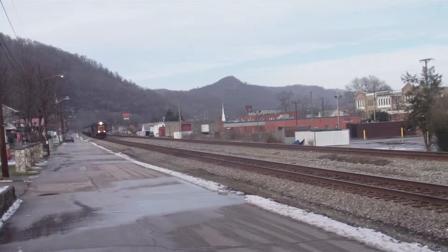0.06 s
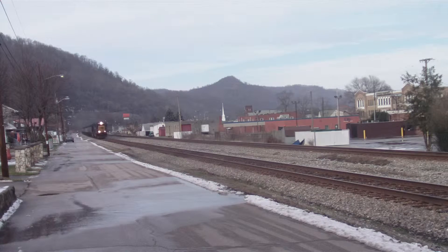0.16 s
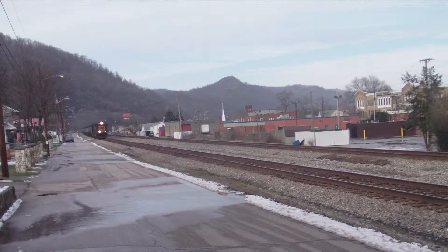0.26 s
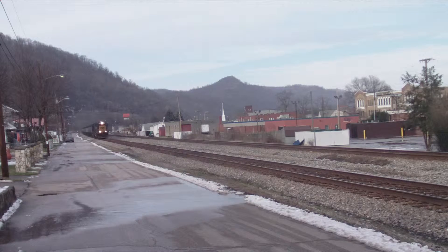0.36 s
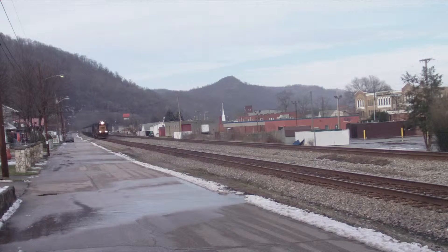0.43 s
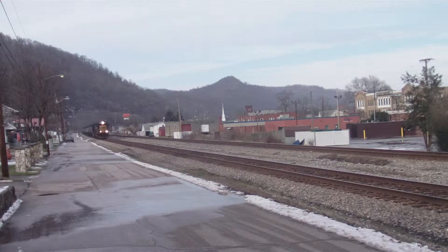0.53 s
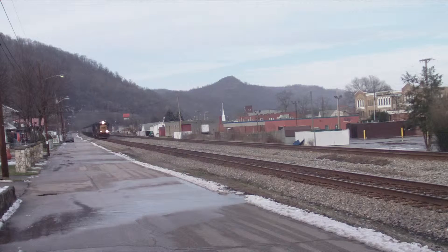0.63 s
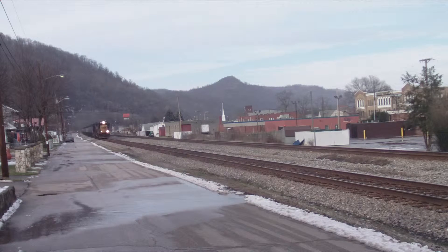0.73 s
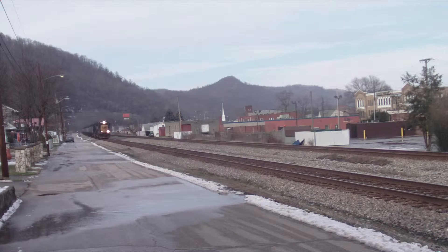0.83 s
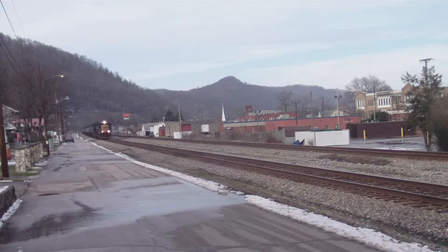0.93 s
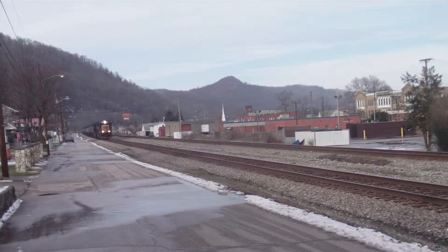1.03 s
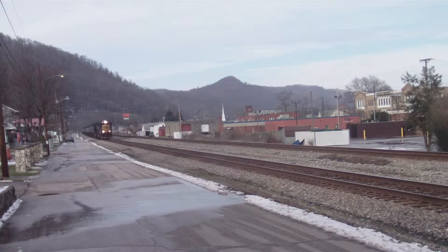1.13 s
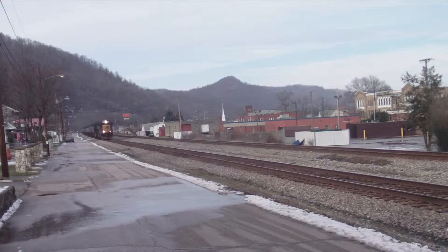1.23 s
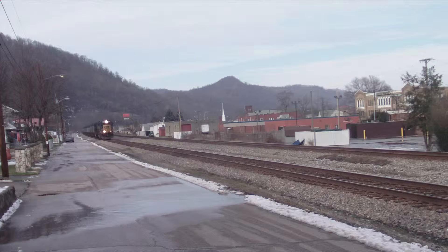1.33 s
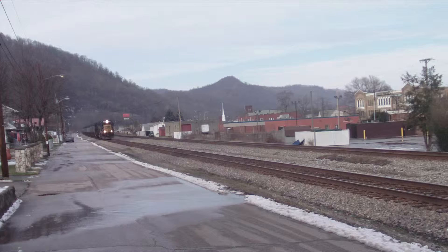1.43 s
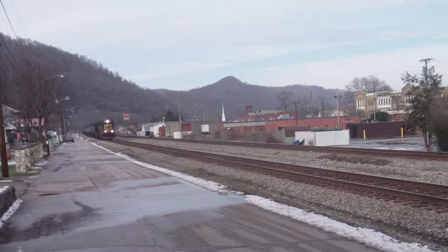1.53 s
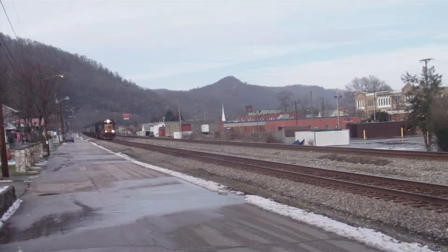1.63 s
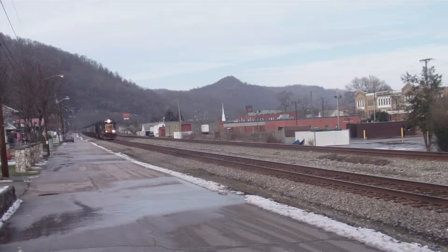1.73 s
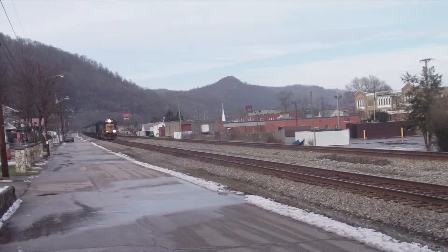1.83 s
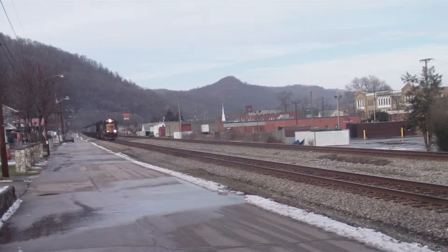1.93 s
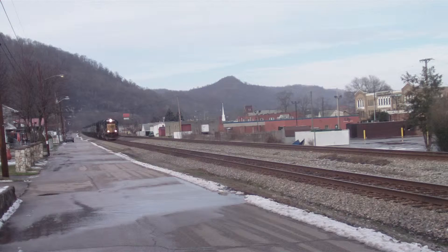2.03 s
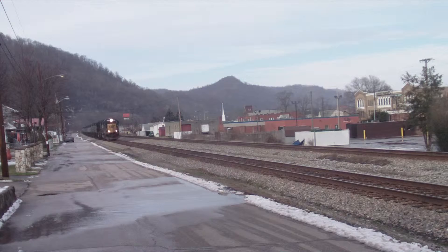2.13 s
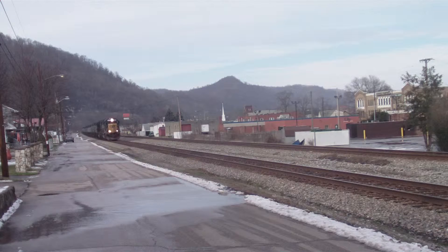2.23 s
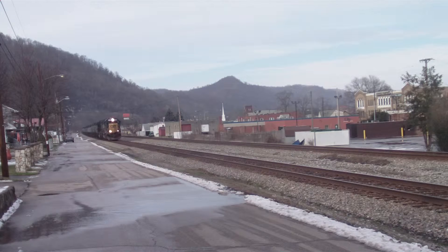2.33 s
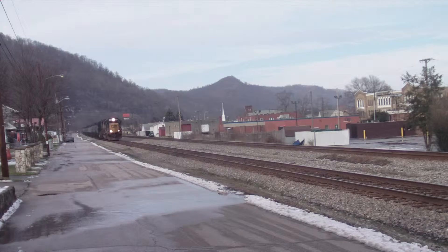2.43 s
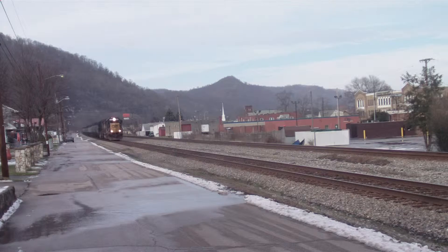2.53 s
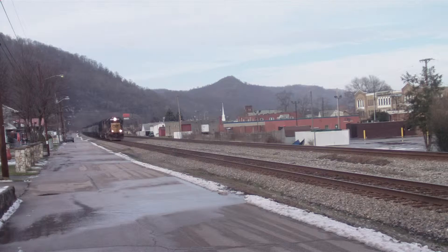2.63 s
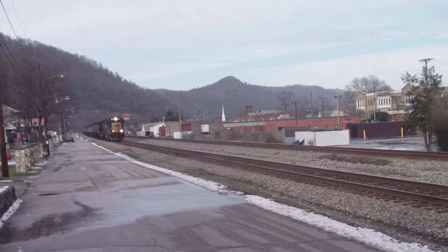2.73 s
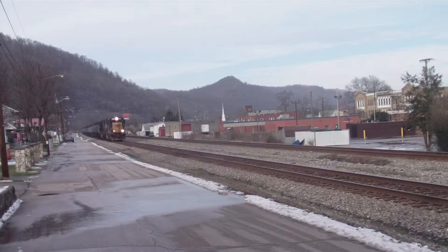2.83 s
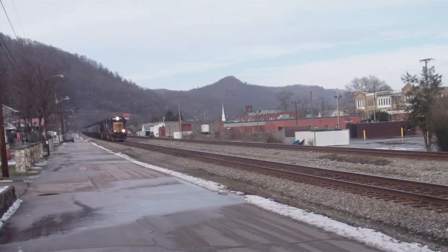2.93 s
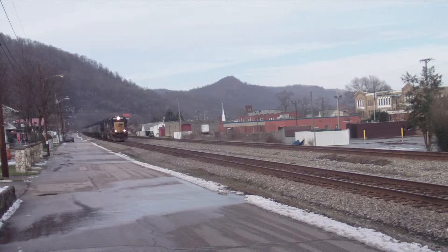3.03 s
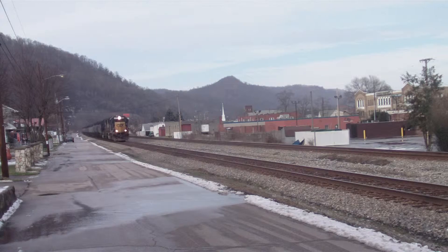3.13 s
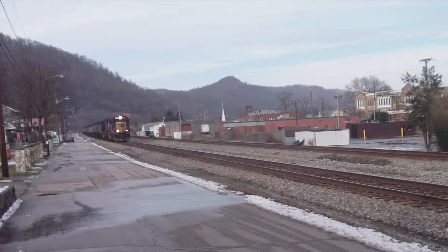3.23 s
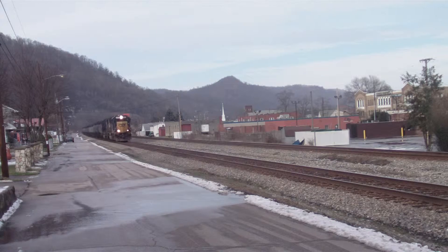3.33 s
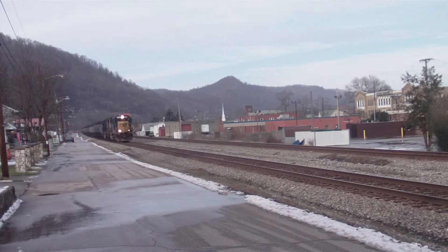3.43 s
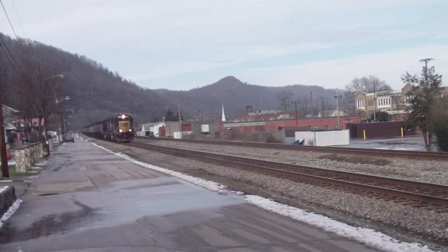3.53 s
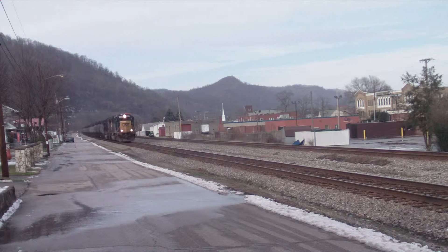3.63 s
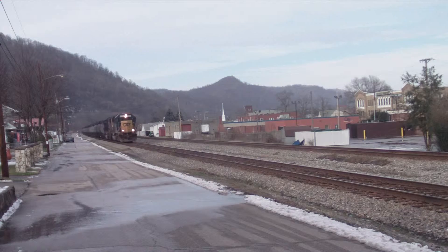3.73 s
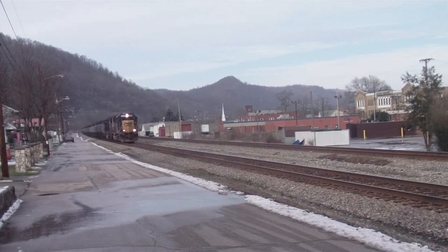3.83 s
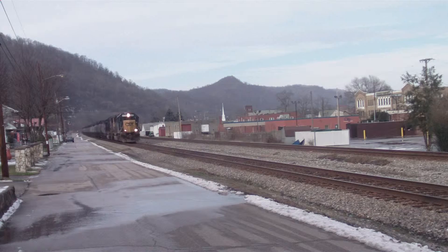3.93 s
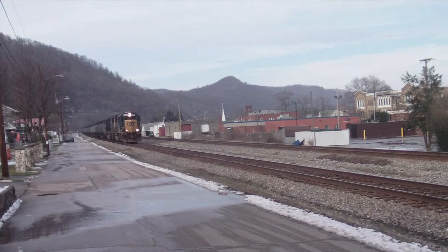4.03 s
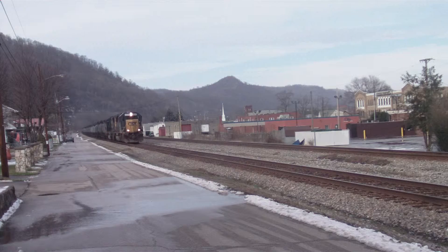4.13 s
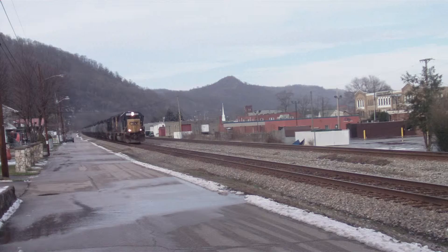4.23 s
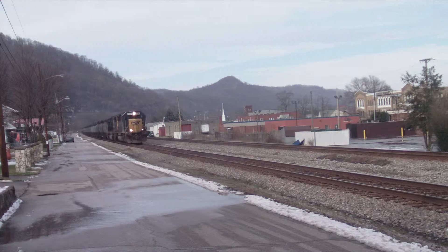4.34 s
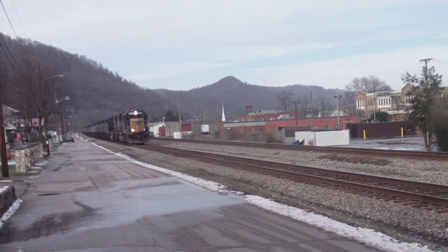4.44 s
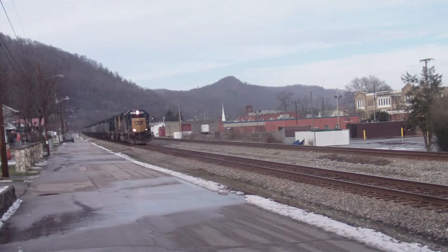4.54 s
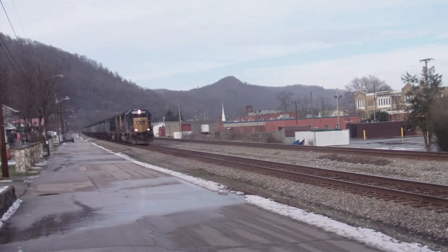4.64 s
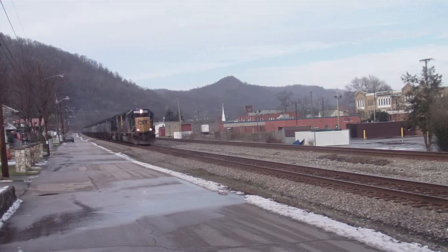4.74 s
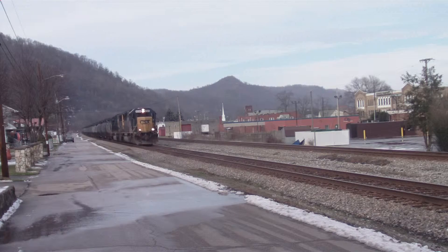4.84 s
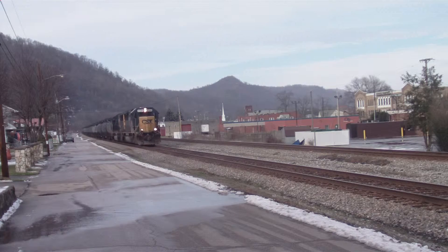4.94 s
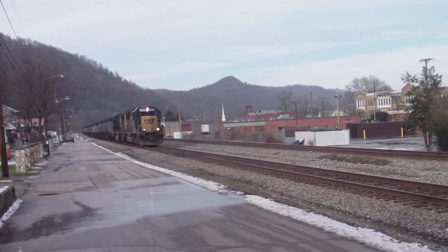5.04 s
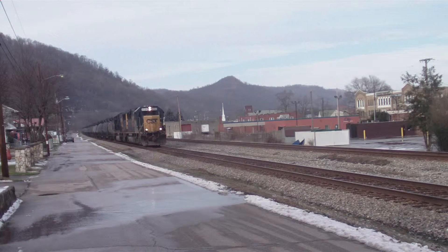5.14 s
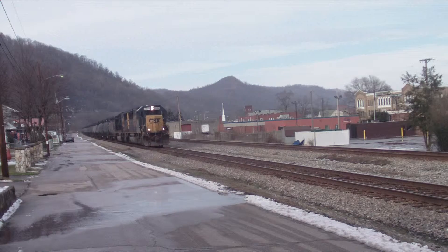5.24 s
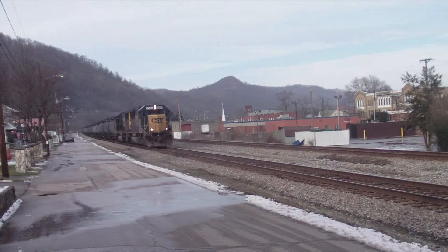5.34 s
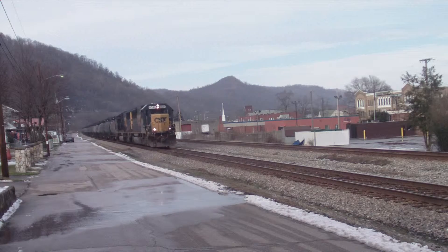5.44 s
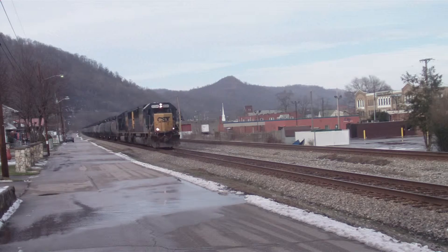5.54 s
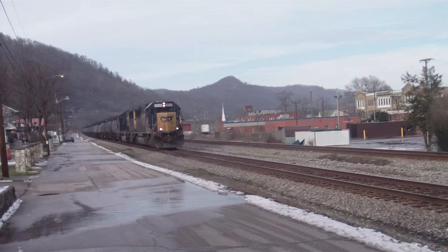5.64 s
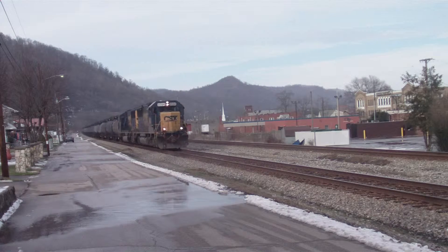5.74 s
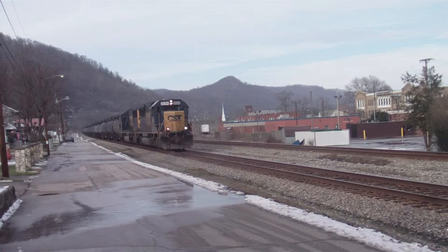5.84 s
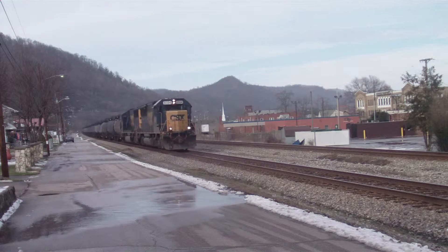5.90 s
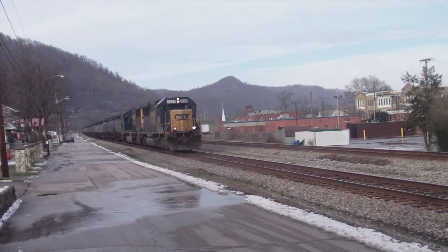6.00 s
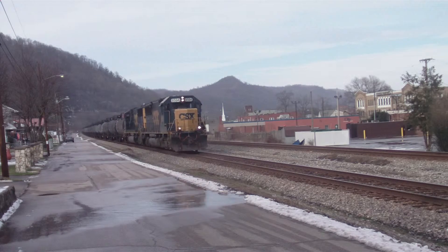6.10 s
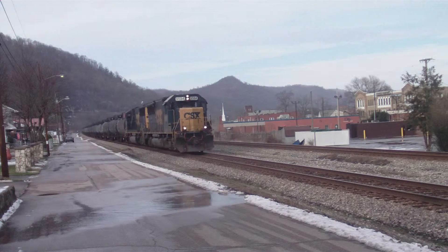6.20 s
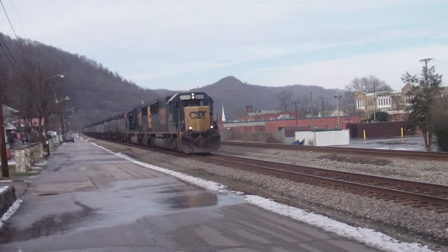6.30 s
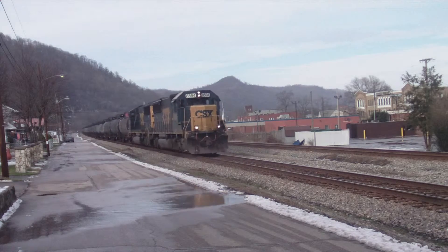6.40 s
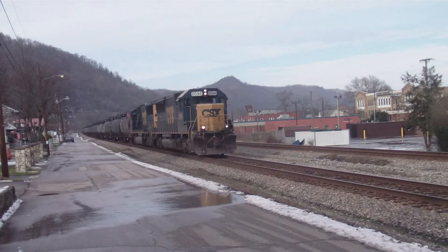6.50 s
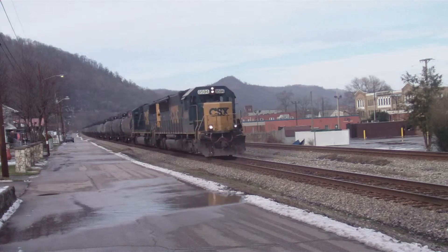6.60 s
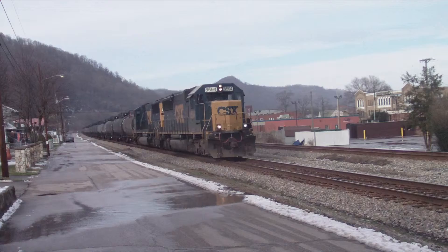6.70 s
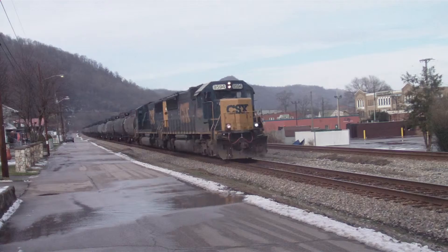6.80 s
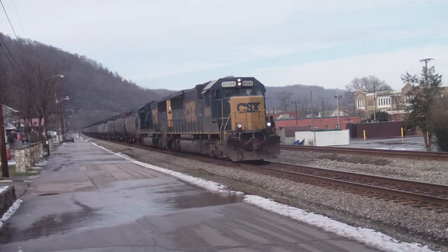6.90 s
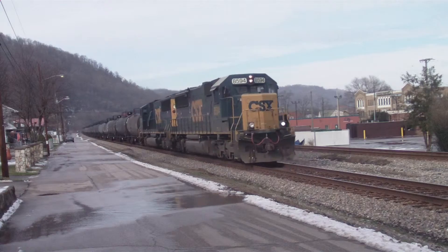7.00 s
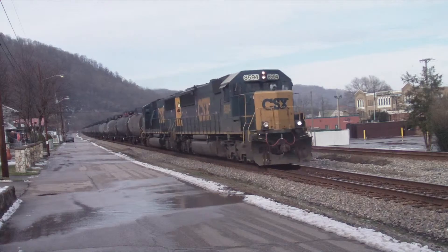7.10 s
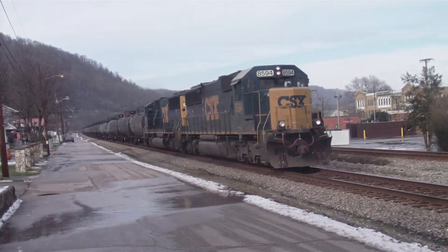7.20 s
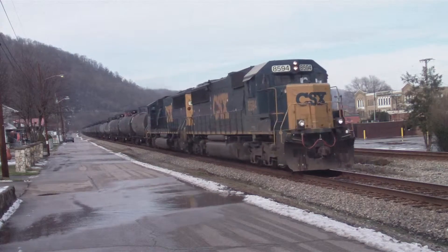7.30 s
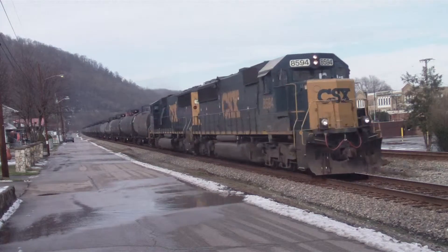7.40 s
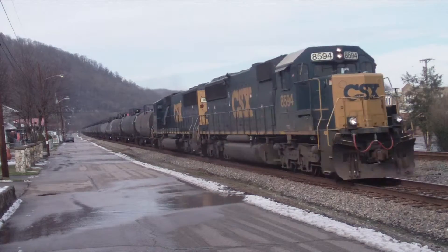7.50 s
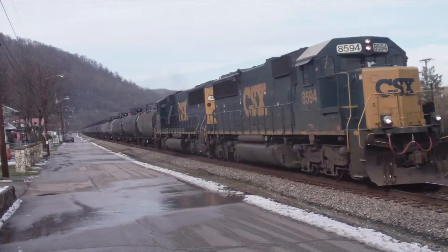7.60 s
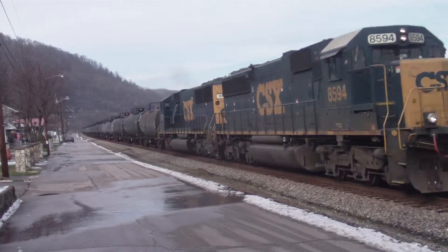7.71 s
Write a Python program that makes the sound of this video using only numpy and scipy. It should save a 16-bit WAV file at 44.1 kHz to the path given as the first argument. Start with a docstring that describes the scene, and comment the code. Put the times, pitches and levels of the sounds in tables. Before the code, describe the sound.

Low beating diesel throb grows from a distant hum to an overwhelming roar, with singing rails, fan whine and wheel hiss as the locomotives arrive.

```python
"""Two diesel locomotives haul a freight train towards a listener beside the track.
Their two-stroke engines, sums of sines on multiples of the crank rate, throb and beat against each other.
Filtered noise gives the swelling exhaust roar, wheel noise and wagons; narrow resonances give the
singing, fizzing rails and the whining fans and gears. A blower hums and whistles as it nears.
Faint birds, scuffs, a tick and a thin buzz sound between, over a distant town and a steady faint hiss."""
import sys
import numpy as np
from scipy import signal
from scipy.fft import rfft, irfft
from scipy.io import wavfile
from scipy.ndimage import uniform_filter1d

SR = 44100
rng = np.random.default_rng(int(sys.argv[2]) if len(sys.argv) > 2 else 0)


def int16_out(signal):
    """Quantize to a 16-bit WAV file."""
    q = np.round(np.clip(np.atleast_2d(signal).T, -1, 1) * 32767)
    wavfile.write(sys.argv[1], SR, q.astype(np.int16))


N = 342216
T = np.arange(N) / SR  # time in seconds


def undb(db):
    """Logarithmic level: decibels become an amplitude gain."""
    return 10 ** (np.asarray(db) / 20)


def unit(x):
    """Normalisation: scale to an rms of 1."""
    return x / np.sqrt(np.mean(x ** 2))


def curves(table):
    """Linear interpolation: each column after the seconds becomes a value per sample."""
    s, *columns = np.transpose(table)
    return [np.interp(T, s, column) for column in columns]


def noise():
    """White noise: equal power at every frequency."""
    return rng.standard_normal(N)


def colour(x, points):
    """Spectral shaping: follow (Hz, dB) points, falling 20 dB per octave past their ends."""
    hz, db = np.transpose(points)
    octave = np.log2(np.maximum(np.fft.rfftfreq(N, 1 / SR), 1))
    outside = np.abs(octave - np.clip(octave, np.log2(hz[0]), np.log2(hz[-1])))
    gain = undb(np.interp(octave, np.log2(hz), db) - 20 * outside)
    return unit(irfft(rfft(x) * gain, N))


def ringing(modes):
    """Noise-driven resonance: random force keeps steep modes of (Hz, width in Hz, dB) ringing."""
    f = np.fft.rfftfreq(N, 1 / SR)
    power = 0
    for hz, width, db in modes:
        detuning = (f - hz) / width * np.sqrt(2)
        power = power + undb(db) ** 2 / width / (1 + detuning ** 2) ** 2
    return unit(irfft(rfft(noise()) * np.sqrt(power), N))


def walk(rate):
    """Slow random modulation: a new level every 1 / rate seconds, joined by lines, rms 1."""
    levels = rng.standard_normal(size=1000)
    return unit(np.interp(T * rate + rng.random(), np.arange(len(levels)), levels))


def tone(cycles, waver_db, drift):
    """Atmospheric scintillation: the air on the way bends a sine's level (dB) and phase (radians)."""
    angle = 2 * np.pi * cycles + drift * walk(5)
    return unit(np.sin(angle) * undb(waver_db * walk(6)))


def burst(s, db, decay):
    """Impact envelope: a sudden contact dies away exponentially."""
    return undb(db) * (T >= s) * np.exp(-np.minimum(np.abs(T - s) / decay, 20))


def bumps(table):
    """Gaussian swells: sum of bell-shaped pulses from rows of (s, height, length in s)."""
    return sum(height * np.exp(-.5 * ((T - s) / length) ** 2) for s, height, length in table)


# The train's path: its speed, when its front draws level, how far to the side the track lies
SPEED_M_S, PASSES_S, TRACK_M = 17.38, 7.815, 7.9
REFERENCE_M = 50


def carried(db, doubling_db, metre_db):
    """Spreading and absorption: level rises as the train's distance shrinks."""
    distance = np.hypot(SPEED_M_S * (T - PASSES_S), TRACK_M)
    spreading = doubling_db * np.log2(distance / REFERENCE_M)
    absorption = metre_db * (distance - REFERENCE_M)  # lost to ground and air
    return db - spreading - absorption


# Far off, the train is partly screened: by how much, the midpoint of coming clear, its time scale
SCREEN_DB, CLEAR_S, CLEARING_S = -3.5, 1.09, .15


def screening():
    """Shielding: the screen's loss in dB fades smoothly to nothing."""
    return SCREEN_DB * (1 - np.tanh((T - CLEAR_S) / CLEARING_S)) / 2


# Surges as the front comes close. Each row: centre in seconds, relative rise in dB, length in seconds.
FRONT_SURGES = [(7.541, 4, .022), (7.682, 5, .025)]


def surging():
    """Level modulation: brief rises, in dB, as the front comes close."""
    return bumps(FRONT_SURGES)


# Hiss of microphone and wheels. Each row: frequency in Hz, relative density in dB per Hz.
HISS_SPECTRUM = [(2000, -2), (3500, 3), (5000, 1.5), (6000, 0.5), (7200, 2), (8000, -0.5), (9000, -9),
                 (12000, -17)]
HISS_DB = -75.5


def steady_hiss():
    """Stationary noise: steady faint microphone hiss."""
    return colour(noise(), HISS_SPECTRUM) * undb(HISS_DB)


# Spectrum of the town's hum. Each row: frequency in Hz, relative density in dB per Hz.
TOWN_SPECTRUM = [(150, -2), (400, -8), (650, 4), (1100, 1.5), (1480, 1.5), (1750, -3.5), (2050, -3),
                 (2500, -30), (5000, -42)]
TOWN_DB = -49


def town():
    """Diffuse background: shaped noise forms the distant hum, its level wavering slowly."""
    return colour(noise(), TOWN_SPECTRUM) * undb(TOWN_DB + 0.41 * walk(2.1))


# Faint chirps, as of birds. Each row: centre in seconds, start in Hz, end in Hz,
# length in seconds, peak level in dB.
BIRD_CHIRPS = [(0.593, 1620, 1415, 0.096, -49), (.65, 6700, 7000, .04, -70),
               (0.909, 1595, 1590, 0.12, -46.5), (1.185, 1560, 1510, 0.085, -47),
               (1.686, 1470, 1608, 0.078, -46), (1.931, 1460, 1600, 0.05, -43),
               (2.228, 8800, 7400, 0.014, -61), (2.869, 1910, 2010, 0.089, -47),
               (3.123, 2230, 2200, .08, -52), (3.165, 11400, 9900, .016, -61),
               (4.529, 7700, 6300, .05, -55), (4.645, 5800, 5100, 0.038, -56)]


def birds(roughness=0.41):
    """Frequency glide: short whistles swell and fade with an unsteady phase."""
    out, flutter = np.zeros(N), roughness * walk(120)
    for s, start_hz, end_hz, length, db in BIRD_CHIRPS:
        during = np.abs(T - s) < length / 2
        progress = (T[during] - s) / length + .5
        cycles = np.cumsum(start_hz + (end_hz - start_hz) * progress) / SR
        whistle = np.sin(2 * np.pi * cycles + 2 * flutter[during])
        out[during] += undb(db) * np.sin(np.pi * progress) * whistle
    return out


# Small scuffs close by. Each row: start in seconds, level in dB, decay in seconds.
SCUFF_EVENTS = [(1.37, -56, .014), (1.603, -49, 0.014), (2.125, -52, 0.014), (2.794, -52, 0.016),
                (4.529, -58, 0.021), (7.408, -35, .008)]
# Spectrum of the scuffs. Each row: frequency in Hz, relative density in dB per Hz.
SCUFF_SPECTRUM = [(2000, -1), (3500, 6), (7000, -2), (9500, -17), (13000, -23)]


def scuffs():
    """Friction noise: shaped noise under sudden, decaying envelopes."""
    return sum(burst(*row) for row in SCUFF_EVENTS) * colour(noise(), SCUFF_SPECTRUM)


# What the tick rings with. Each row: frequency in Hz, level in dB against TICK_DB, decay in seconds.
TICK_RESONANCES = [(3980, -0.5, 0.0024), (4400, -5, .0015), (5250, -2, 0.00091), (7070, 6.5, 0.00077),
                   (8600, -3, 0.00058), (10400, 0, .0005)]
TICK_S, TICK_DB = 5.752, -27


def tick():
    """Modal impact: one sharp contact close by sets decaying sines ringing together."""
    out = 0
    for hz, db, decay in TICK_RESONANCES:
        out = out + burst(TICK_S, TICK_DB + db, decay) * np.sin(2 * np.pi * hz * (T - TICK_S))
    return out


# Tones of a brief thin buzz, as of a small motor. Each row: frequency in Hz, level in dB.
BUZZ_TONES = [(6272, -55), (7840, -46.5), (9408, -63), (10976, -59), (12544, -59)]
BUZZ_S, BUZZ_LENGTH_S = 4.119, .019  # centre and length


def buzz():
    """Additive synthesis: steady sines sound together for a moment."""
    running = 1. * (np.abs(T - BUZZ_S) < BUZZ_LENGTH_S / 2)
    tones = sum(undb(db) * np.sin(2 * np.pi * hz * T) for hz, db in BUZZ_TONES)
    return uniform_filter1d(running, size=60) * tones  # smoothed switching


# Spectrum of wheels on steel. Each row: frequency in Hz, relative density in dB per Hz.
WHEEL_SPECTRUM = [(500, -3), (900, -1), (1200, -1), (1450, -1.5), (1750, -2.5), (2020, -4), (2400, -7.5),
                  (3300, -11.5), (4500, -19), (6500, -28.5), (10000, -37.5), (15000, -51)]
WAGONS_DB = -50.5


def wagons(screen_db):
    """Extended line source: the long row of wagons rushes at a nearly even level once clear."""
    return colour(noise(), WHEEL_SPECTRUM) * undb(WAGONS_DB + screen_db + 0.57 * walk(6))


# Rail resonances between sleepers. Each row: frequency in Hz, width in Hz, relative level in dB.
SLEEPER_MODES = [(860, 97, -7.5), (956, 61, -2.5), (1040.5, 54, -4)]
# How the song carries: dB at REFERENCE_M before trim, dB lost per doubling, dB lost per metre.
SONG_LOSS = (-44.5, 4.4, 0)
# Waves far ahead along the rail head. Each row: frequency in Hz, width in Hz, relative level in dB.
RAIL_HEAD_MODES = [(9980, 1200, 0.5), (11600, 400, -6.5), (13360, 1400, 0)]
# The fizz arrives ahead of the train. Each row: time in seconds, level in dB.
FIZZ_LEVEL = [(0, -76), (2, -76.5), (3.5, -74), (4.4, -67), (6, -55.5), (7.76, -56)]
# Grit under the wheels. Each row: centre in seconds, peak level in dB, length in seconds.
GRIT_ZINGS = [(.87, -71, .04), (4.068, -69, .04), (4.6, -62, .03), (5.36, -55, .035), (6.19, -61, .02),
              (7.24, -46, .015)]


def rails():
    """Structure-borne sound: rails sing near 1 kHz, fizz far above and carry zings of crushed grit."""
    song_db = carried(*SONG_LOSS) + 1.8 * walk(9)
    song = ringing(SLEEPER_MODES) * undb(song_db + 0.5)
    fizz = ringing(RAIL_HEAD_MODES) * undb(curves(FIZZ_LEVEL)[0])
    swell = bumps([(s, undb(db), length) for s, db, length in GRIT_ZINGS])
    zings = swell * ringing([(14200, 1300, 0)])
    return song + fizz + zings


# Highest treble of the wheels. Each row: frequency in Hz, relative density in dB per Hz.
SIZZLE_SPECTRUM = [(7500, -12), (8800, -4.5), (9850, 0.5), (10600, -9.5), (12000, -14), (15000, -32)]
# How the hiss carries: dB at REFERENCE_M before trim, dB lost per doubling, dB lost per metre.
HISS_LOSS = (-63, 5.58, 0.22)


def wheel_treble():
    """Air absorption: hiss gets through only from near, and the highest treble catches up last."""
    hiss_db = carried(*HISS_LOSS)
    hiss = colour(noise(), HISS_SPECTRUM) * undb(hiss_db + 7.0 + 0.92 * walk(19))
    sizzle_db = hiss_db + np.interp(T, [5.2, 7.2], [-7, 3])
    return hiss + colour(noise(), SIZZLE_SPECTRUM) * undb(sizzle_db)


# Spectrum of the bogies. Each row: frequency in Hz, relative density in dB per Hz.
BOGIE_SPECTRUM = [(220, -18), (340, -6.5), (420, -1), (510, 1), (600, -5), (680, -9), (780, -9.5),
                  (1000, -8.5), (1600, -35)]
# Fans and gears. Each row: frequency in Hz, width in Hz, relative level in dB.
FAN_GEAR_MODES = [(299.6, 7.2, -10), (372.8, 7, -14.5), (418.3, 13, -23.5), (875, 5.2, -9.5),
                  (1575, 50, -12.5)]
# How gear and wheels carry: dB at REFERENCE_M before trim, dB lost per doubling, dB lost per metre.
GEAR_LOSS = (-40.5, 6.23, 0.0055)
WHEEL_LOSS = (-45.5, 4.66, 0.06)


def rolling(surge_db, shudder_db=1.78):
    """Roughness excitation: bogies roar, fans and gears whine, wheels rush on the steel."""
    gear_db = carried(*GEAR_LOSS) + surge_db
    wheel_db = carried(*WHEEL_LOSS) + surge_db
    # uneven treads shake bogie and wheel together; distance smears this out
    shudder = shudder_db * walk(28) * np.interp(T, [4, 7.5], [.5, 1.3])
    gear = colour(noise(), BOGIE_SPECTRUM) * undb(gear_db - 1.5 + shudder)
    whine = ringing(FAN_GEAR_MODES) * undb(gear_db - 8.5)
    wheels = colour(noise(), WHEEL_SPECTRUM) * undb(wheel_db + 1.34 + 0.41 * shudder)
    return gear + whine + wheels


# The leading engine's blower and turbine. Each row: time in seconds, hum in dB before trim,
# whistle in dB before trim.
BLOWER_LEVELS = [(0, -64, -47.5), (4.6, -58, -52.5), (5.35, -45.5, -51), (6.1, -42.5, -36.5),
                 (6.5, -41, -35.5), (7.3, -52, -35.5), (7.52, -27, -36), (7.76, -21, -29)]
BLOWER_HZ, TURBINE_HZ = 531.5, 1022


def blower():
    """Rotor tones: a hum and a breathy whistle stand clear of the roar as the locomotive nears."""
    hum_db, whistle_db = curves(BLOWER_LEVELS)
    hum = tone(BLOWER_HZ * T, waver_db=-0.3, drift=.8)
    breath = ringing([(TURBINE_HZ, 24, 0)])
    whistle = unit(breath + .6 * tone(TURBINE_HZ * T, waver_db=2, drift=1.6))
    return hum * undb(hum_db - 0.5) + whistle * undb(whistle_db - 5.0)


# How the rumble carries: dB at REFERENCE_M before trim, dB lost per doubling, dB lost per metre.
RUMBLE_LOSS = (-25, 2.7, .005)


def rumbling(screen_db):
    """Low-frequency propagation: the level in dB shared by exhaust rumble and low engine tones."""
    return carried(*RUMBLE_LOSS) + screen_db + 1.0 * walk(7)


BANK_CYLINDERS = 8  # firings of a cylinder bank per turn
# Spectra of exhaust rumble and roar. Each row: frequency in Hz, relative density in dB per Hz.
RUMBLE_SPECTRUM = [(12, -34), (25, -18.5), (38, -22), (50, 4.5), (75, -6.5), (100, 12), (120, -9),
                   (170, -16), (300, -58.5)]
ROAR_SPECTRUM = [(90, -13.5), (130, 1), (170, 1.5), (230, -2), (295, 0), (350, -10), (450, -22), (900, -45)]
# Throaty band, swallowed by the ground until the stacks are close.
# Each row: frequency in Hz, width in Hz, relative level in dB.
THROAT_MODES = [(365, 30, -1), (400, 35, 1.5)]
# How roar and growl carry: dB at REFERENCE_M before trim, dB lost per doubling, dB lost per metre.
ROAR_LOSS = (-32, 3.62, 0.095)
GROWL_LOSS = (-49.5, 7.4, .01)


def exhaust(turns, rumble_db, surge_db, chug=0.071, puff=0.41):
    """Jet turbulence: gas leaves the stacks in a puff per firing, stronger once a turn."""
    roar_db = carried(*ROAR_LOSS) + 0.19 * surge_db
    growl_db = carried(*GROWL_LOSS) + .5 * surge_db
    once_a_turn = 1 + chug * np.cos(2 * np.pi * turns)
    per_firing = 1 + puff * np.cos(2 * np.pi * BANK_CYLINDERS * turns)
    rumble = colour(noise(), RUMBLE_SPECTRUM) * undb(rumble_db - 6.5)
    roar = colour(noise() * once_a_turn * per_firing, ROAR_SPECTRUM)
    roar = roar * undb(roar_db - 0.1 + 0.46 * walk(12))
    return rumble + roar + ringing(THROAT_MODES) * undb(growl_db)


# The trailing engine turns a little faster; at one moment the two are in step
TRAIL_LEAD_HZ, IN_STEP_S = .429, 6.885
# Leading engine, easing off at first. Each row: time in seconds, crank turns per second in Hz.
CRANK_RATE = [(0, 13.0), (.7, 12.7), (1.3, 11.9), (1.7, 11.59), (7.76, 11.6)]


def crank_turns():
    """Phase accumulation: the summed crank rate counts turns, zero at the moment in step."""
    turns = np.cumsum(curves(CRANK_RATE)[0]) / SR
    return turns - np.interp(IN_STEP_S, T, turns)


# The leading engine's main note swells and fades slowly. Each row: time in seconds, level in dB.
FIRING_LEVEL = [(0, -29.5), (.7, -31.5), (1.03, -40.5), (1.42, -23.5), (1.8, -26), (2.5, -26.5), (3.2, -25),
                (3.7, -19), (4.35, -23), (4.64, -33.5), (4.9, -17), (5.65, -23), (6.3, -15), (6.6, -20),
                (6.83, -9.5), (7.2, -24), (7.48, -9.5), (7.76, -23)]
# Exhaust tones. Each row: multiple of the crank rate, leading engine in relative dB,
# trailing engine in relative dB.
ENGINE_ORDERS = [(2, -17, -27), (3, -15.5, -15), (4, -11, -5), (5, -10.5, -1.6), (6, -3.5, -11),
                 (7, -7, -4), (9, -15.5, -7.5), (10, -20.5, -17), (11, -25, -20.5), (12, -26.5, -21.5)]
# How overtones carry: dB at REFERENCE_M before trim, dB lost per doubling, dB lost per metre.
OVERTONE_LOSS = (-21.5, 1, 0.14)


def engines(turns, rumble_db, lope=0.43, trail_note_db=-7):
    """Engine orders and beating: unequal cylinders lope each turn; engines beat about 3 times a second."""
    trail_turns = turns + TRAIL_LEAD_HZ * (T - IN_STEP_S)
    firing_db, = curves(FIRING_LEVEL)
    overtone_db = carried(*OVERTONE_LOSS)
    lead_note = tone(BANK_CYLINDERS * turns, waver_db=1.5, drift=0.12)
    lead_note = lead_note * (1 + lope * np.cos(2 * np.pi * turns))
    trail_note = tone(BANK_CYLINDERS * trail_turns, waver_db=7.0, drift=0.38)
    throb = 0
    for multiple, lead_db, trail_db in ENGINE_ORDERS:
        order = round(multiple)
        lead = undb(lead_db) * tone(order * turns + rng.random(), waver_db=0.9, drift=0.65)
        trail = undb(trail_db) * tone(order * trail_turns + rng.random(), waver_db=1.45, drift=0.64)
        order_db = rumble_db if multiple < BANK_CYLINDERS else overtone_db
        throb = throb + (lead + trail) * undb(order_db)
    notes = lead_note * undb(firing_db) + trail_note * undb(overtone_db + trail_note_db)
    return notes + throb * undb(-2.5)


def scene():
    """Superposition: train, surroundings and hiss add, the same on both channels."""
    screen_db, surge_db = screening(), surging()
    rumble_db = rumbling(screen_db)
    turns = crank_turns()
    background = steady_hiss() + town() + birds() + scuffs() + tick() + buzz()
    track = wagons(screen_db) + rails() + wheel_treble() + rolling(surge_db)
    power = blower() + exhaust(turns, rumble_db, surge_db) + engines(turns, rumble_db)
    return np.tile(background + track + power, (2, 1))


TOP_HZ = 15200


def record(dry):
    """Saturation and band limiting: round the very loudest peaks, then cut the top above TOP_HZ."""
    held = dry / (1 + dry ** 8) ** (1 / 8)
    low_pass = signal.ellip(10, .2, 80, TOP_HZ, fs=SR, output="sos")
    return signal.sosfilt(low_pass, held)


dry = scene()
out = record(dry)
int16_out(out)
```